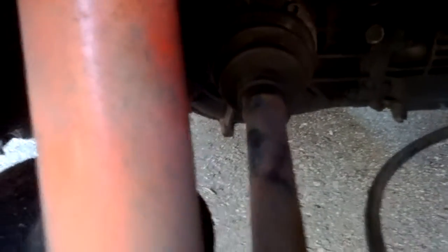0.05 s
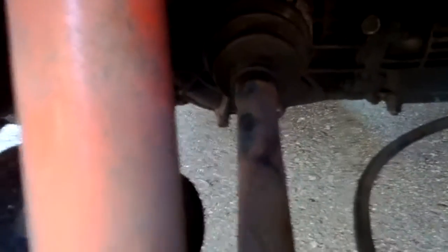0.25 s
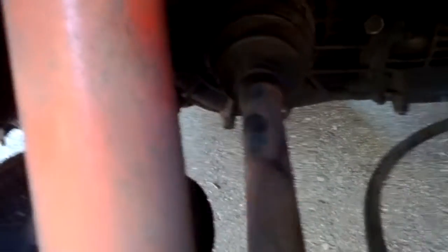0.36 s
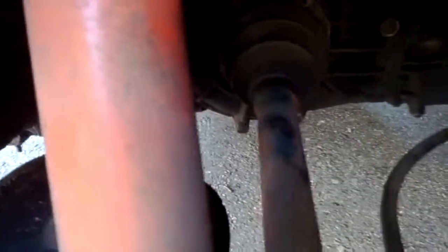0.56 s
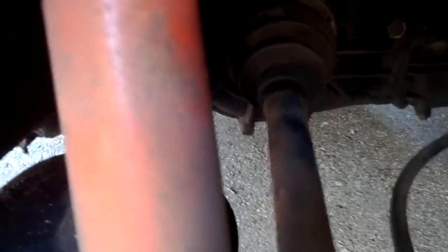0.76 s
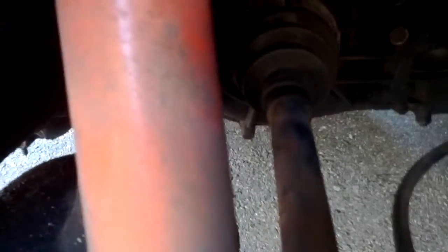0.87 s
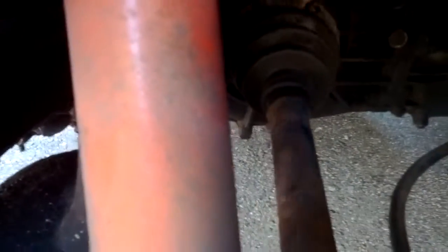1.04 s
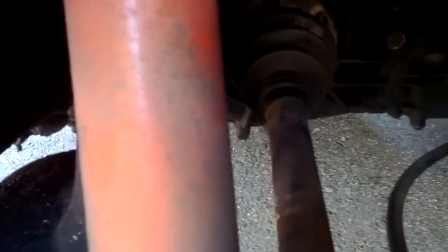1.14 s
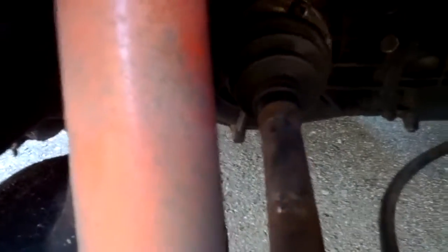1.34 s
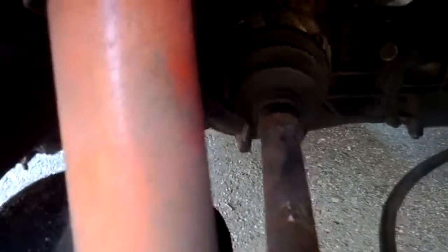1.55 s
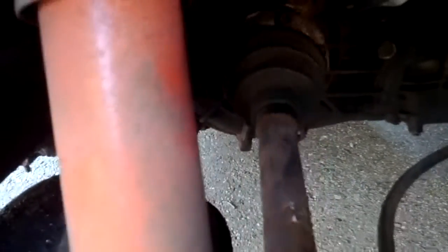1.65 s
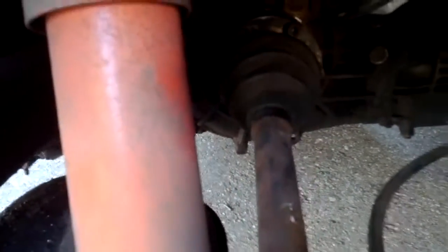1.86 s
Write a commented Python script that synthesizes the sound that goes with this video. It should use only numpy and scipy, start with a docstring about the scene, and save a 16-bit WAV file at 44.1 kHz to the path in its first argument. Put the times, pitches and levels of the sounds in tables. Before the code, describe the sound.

A car axle joint clunks loudly, then turns with a metallic hiss and a duller knock.

```python
"""Drive shaft slack, close under a car.

The shaft is turned to and fro. The slack in its joint closes with a tick and a sharp steel clunk
that overloads the microphone. The shaft then turns with a rubbing hiss that rings in the same steel;
a duller knock and a few soft bumps follow before it stops. Suspension thuds and outdoor air lie below."""
import sys
import numpy as np
from scipy import signal
from scipy.io import wavfile
from scipy.ndimage import uniform_filter1d

SR = 44100
rng = np.random.default_rng(int(sys.argv[2]) if len(sys.argv) > 2 else 0)


def digitize_waveform(pressure):
    """Quantize a signal to 16-bit integers and store it at the path in sys.argv[1].

    Rows of a 2-D input are taken as channels; values are limited to [-1, 1].
    """
    field = np.atleast_2d(pressure).T
    bounded = np.clip(field, -1, 1)
    quanta = np.round(bounded * 32767).astype(np.int16)
    wavfile.write(sys.argv[1], SR, quanta)


N = 83790
TIME_S = np.arange(N) / SR

# modes of shaft and hub: pitch_hz, struck_db, t60_s, rubbed_db
STEEL_MODES = [(475, -6, .25, -7), (805, -6, .15, -24), (913, 0, .1, -14), (1050, -13, .62, -18),
               (1189, 2, .12, -16), (1277, 0, .1, -20), (1406, 0, .1, -20), (1691, 0, .42, -6),
               (1780, 2, .24, -7), (1913, -8, .25, -2), (1945, 2, .25, -1), (2012, -2, .23, -9),
               (2253, 6, .17, -11), (2301, 2, .27, -3), (2406, 2, .46, -2), (2638, -7, .5, -12),
               (2790, -5, .23, -15), (3613, -2, .11, -16), (4535, 4, .1, -16), (4617, 4, .09, -18),
               (4770, -2, .1, -13), (5173, 0, .1, -12), (6445, -16, .25, -8), (8260, -14, .06, -15),
               (9560, -12, .03, -10), (11370, -5, .08, -17), (14100, -18, .04, -15)]
# friction spectrum: freq_hz, density_db
RUB_SPECTRUM = [(300, -15), (390, -21), (500, -10.5), (650, -14.5), (950, -10.5), (1400, -16), (2000, -7),
                (2800, -16), (3800, -13.5), (5000, -14), (6400, -16.5), (7600, -22), (10300, -22),
                (11800, -19.5), (15500, -20.5)]


def from_db(db):
    """Decibels to gain."""
    return 10 ** (np.asarray(db) / 20)


def unit_rms(x):
    """Scale to rms 1."""
    return x / np.sqrt(np.mean(x ** 2) + 1e-20)


def level_curve(points):
    """Gain over time from (time_s, level_db) points."""
    return from_db(np.interp(TIME_S, *np.transpose(points)))


def at_hz(points, hz):
    """Read (freq_hz, value) points on a log-frequency axis."""
    freqs_hz, values = np.transpose(points)
    return np.interp(np.log(hz), np.log(freqs_hz), values)


def ring(drive, hz, t60_s):
    """One mode: a unit click starts a decaying sine of height 1."""
    r, w = from_db(-60 / (t60_s * SR)), 2 * np.pi * hz / SR
    return signal.lfilter([0, np.sin(w)], [1, -2 * r * np.cos(w), r * r], drive + 1e-18)


def bands(spectrum):
    """Third-octave noise bands that sum to rms 1: centres_hz, signals."""
    edges_hz = 22 * 2 ** (np.arange(30) / 3)
    centres_hz = np.sqrt(edges_hz[:-1] * edges_hz[1:])
    white = rng.standard_normal((2, N))
    above_oct = np.maximum(np.log2(centres_hz / spectrum[-1][0]), 0)
    below_oct = np.maximum(np.log2(spectrum[0][0] / centres_hz), 0)
    gains = from_db(at_hz(spectrum, centres_hz) - 24 * above_oct - 12 * below_oct)
    parts = np.zeros((len(gains), N))
    for k, gain in enumerate(gains):
        bandpass = signal.butter(2, edges_hz[k:k + 2], "band", fs=SR, output="sos")
        parts[k] = gain * signal.sosfilt(bandpass, white[k % 2])
    return centres_hz, parts / parts.sum(0).std()


def noise(spectrum):
    """Coloured noise, rms 1."""
    return bands(spectrum)[1].sum(0)


def blow(start_s, rise_s, t60_s):
    """Impact envelope: linear rise, exponential decay."""
    age_s = np.maximum(TIME_S - start_s, 0)
    decay_db = -60 * np.maximum(age_s - rise_s, 0) / t60_s
    return np.minimum(age_s / rise_s, 1) * from_db(np.maximum(decay_db, -200))


def click(start_s):
    """Unit impulse."""
    return 1. * (np.arange(N) == int(start_s * SR))


def strike(modes, start_s):
    """Click into (pitch_hz, level_db, t60_s) modes of alternating sign."""
    return sum((-1) ** k * from_db(db) * ring(click(start_s), hz, t60_s)
               for k, (hz, db, t60_s, *_) in enumerate(modes))


def clunks():
    """Steel meets steel: the housing crashes, treble dying first, and the shaft rings on."""
    # joint contacts: start_s, level_db, lowpass_hz
    contacts = [(.2058, -30, 11830), (0.2472, -1, 16040)]
    # housing crash: freq_hz, density_db
    crash_spectrum = [(60, -33.5), (130, -11.5), (300, -9.5), (600, -19), (900, 0), (1400, -3.5), (2300, 2),
                      (3000, -6), (4700, 3), (6000, -14.5), (8000, -24), (11300, -14.5), (15500, -17.5)]
    # housing decay: freq_hz, t60_s
    crash_decay = [(120, 0.65), (450, 0.19), (1000, 0.12), (2200, 0.15), (4500, 0.083), (8000, 0.065),
                   (14000, .065)]
    rise_s, out = 0.00036, 0
    centres_hz, parts = bands(crash_spectrum)
    for start_s, db, lowpass_hz in contacts:
        crash = sum(part * blow(start_s, rise_s, at_hz(crash_decay, hz))
                    for hz, part in zip(centres_hz, parts))
        crack = from_db(2) * parts.sum(0) * blow(start_s, rise_s, t60_s=0.024)
        clunk = from_db(-6.5) * (crash + crack) + from_db(-22) * strike(STEEL_MODES, start_s)
        lowpass = signal.butter(1, lowpass_hz, fs=SR)
        out += from_db(db) * signal.lfilter(*lowpass, clunk)
    return out


def knocks():
    """Cushioned contacts: a hollow ring over a dull burst, with a tick where bare metal touches."""
    # knocks of the slack: start_s, level_db, rise_s, tick_db
    contacts = [(.2045, -12, 0.0014, -40), (.228, -29, 0.0025, -38), (0.753, -24, 0.0037, -40),
                (1.028, -25, 0.006, -30), (1.071, -25, 0.0013, -6), (1.2598, 0.5, 0.00088, -33)]
    # hollow ring: pitch_hz, level_db, t60_s
    hollow_modes = [(735, -26, .06), (932, -14, .08), (1056, -19, .075), (1190, -20, .075),
                    (1290, -26, .05), (1696, -29, .18), (1787, -29, .18), (1950, -30, .12),
                    (2638, -39, .15), (4170, -43, .15)]
    # dull burst: freq_hz, density_db
    burst_spectrum = [(120, -10), (260, -2.5), (480, -16), (900, 8), (1250, 1), (1800, -3.5), (2800, -16.5),
                      (4500, -24), (7000, -34.5)]
    # metal tick: freq_hz, density_db
    tick_spectrum = [(1500, -6), (2800, 0), (5000, -10.5), (8000, -20)]
    dull = from_db(-21.5) * noise(burst_spectrum)
    bright = from_db(-8.5) * noise(tick_spectrum)
    out = 0
    for start_s, db, rise_s, tick_db in contacts:
        onset = np.clip((TIME_S - start_s) / rise_s, 0, 1)
        hollow = from_db(-1) * strike(hollow_modes, start_s) * onset
        burst = dull * blow(start_s, rise_s, t60_s=0.13)
        tick = from_db(tick_db) * bright * blow(start_s, rise_s, t60_s=0.029)
        out += from_db(db) * (hollow + burst + tick)
    return out


def suspension():
    """Heavy parts around the shaft shudder: thuds, boom and rumble."""
    # shudders: start_s, level_db
    shudders = [(.035, -47), (.168, -51), (0.21, -35), (.256, -30.5), (.64, -49), (0.75, -41.5),
                (1.031, -40), (1.076, -46), (1.26, -38), (1.290, -30.5), (1.829, -44.5)]
    # thud noise: freq_hz, density_db
    thud_spectrum = [(40, -21), (90, -8), (170, -0.5), (260, -3.5), (400, -11), (650, -13.5), (1200, -43.5)]
    # suspension boom: pitch_hz, level_db, t60_s
    boom_modes = [(121, -10, .22), (185, -1, .19), (240, -4, .15), (472.3, -10, 0.2)]
    # rumble envelope: time_s, level_db
    rumble_levels = [(0, -42.5), (.1, -54.5), (.2, -55), (.3, -44), (.45, -45.5), (.56, -54), (.95, -54.5),
                     (1.12, -44), (1.24, -44), (1.33, -49), (1.58, -53), (1.72, -64), (1.9, -56)]
    # rumble noise: freq_hz, density_db
    rumble_spectrum = [(25, -17), (38, -8.5), (52, 2), (72, -8), (120, -10.5), (250, -25.5), (600, -54)]
    rise_s = 0.00705
    envelope = sum(from_db(db) * blow(start_s, rise_s, t60_s=0.2) for start_s, db in shudders)
    impulses = sum(from_db(db) * click(start_s + rise_s) for start_s, db in shudders)
    pushes = uniform_filter1d(impulses, size=30)
    boom = sum(from_db(db) * ring(pushes, hz, t60_s) for hz, db, t60_s in boom_modes)
    return envelope * noise(thud_spectrum) + boom + level_curve(rumble_levels) * noise(rumble_spectrum)


def turning():
    """Friction hisses and keeps the steel ringing; the gears drone below."""
    # rubbing envelope: time_s, level_db
    rub_levels = [(0, -49), (.08, -69.5), (.2, -59.5), (.25, -53.5), (.32, -42.5), (.6, -41.5), (.82, -47),
                  (.97, -45), (1.1, -45), (1.2, -47), (1.36, -42), (1.5, -45.5), (1.62, -43), (1.76, -47.5),
                  (1.81, -53), (1.845, -64), (1.9, -67.5)]
    # gear drone: freq_hz, density_db
    drone_spectrum = [(60, -23.5), (118, 0), (150, -6), (210, 0), (300, -7.5), (600, -25)]
    grain_db = 0.78 * unit_rms(uniform_filter1d(rng.standard_normal(N), size=150))
    grain = from_db(grain_db)
    hiss = (from_db(-3) * noise(RUB_SPECTRUM) + from_db(-9) * fine_ring()) * grain
    steel = sum(from_db(rubbed_db) * unit_rms(ring(rng.standard_normal(N) * grain, hz, t60_s))
                for hz, _, t60_s, rubbed_db in STEEL_MODES)
    drone = from_db(-10.5) * noise(drone_spectrum)
    return level_curve(rub_levels) * (hiss + from_db(-9.5) * steel + drone)


def fine_ring():
    """Dense high steel modes stirred by friction, rms 1."""
    friction = rng.standard_normal(N)
    pitches_hz = rng.uniform(2793, 15550, size=70)
    return unit_rms(sum(from_db(at_hz(RUB_SPECTRUM, hz)) * ring(friction, hz, t60_s=0.197)
                        for hz in pitches_hz))


def whistles():
    """Faint wavering friction tones, each swelling and fading."""
    # friction tones: pitch_hz, centre_s, half_width_s, level_db
    tones = [(198, .6, .2, -51), (1935, .57, .16, -49), (3042, 1.05, .2, -56), (11105, 1.08, .19, -58),
             (2320, 1.55, .2, -53), (3708, 1.62, .16, -57), (482, 1.72, .08, -55)]
    out = 0
    for hz, centre_s, half_width_s, db in tones:
        swell = np.exp(-((TIME_S - centre_s) / half_width_s) ** 2)
        tone = unit_rms(ring(rng.standard_normal(N), hz, t60_s=.08))
        out += from_db(db) * swell * tone
    return out


def outdoor_air():
    """Steady, mostly low background noise."""
    # outdoor background: freq_hz, density_db
    air_spectrum = [(24, -34.5), (40, -14), (74, -3), (108, -14.5), (824, -26), (1000, -34), (2340, -39.5),
                    (8690, -40.5), (15000, -30)]
    return from_db(-58) * noise(air_spectrum)


def scene():
    """All sources at one close microphone."""
    return (clunks() + knocks() + suspension() + turning() + whistles() + outdoor_air())[None]


def record(dry):
    """Microphone overload flattens the peaks; a steep low-pass cuts the top."""
    ceiling, cutoff_hz = .73, 15700
    clipped = dry / (1 + (dry / ceiling) ** 6) ** (1 / 6)
    lowpass = signal.ellip(10, .05, 60, cutoff_hz, fs=SR, output="sos")
    return signal.sosfiltfilt(lowpass, clipped)


dry = scene()
out = record(dry)
digitize_waveform(out)
```